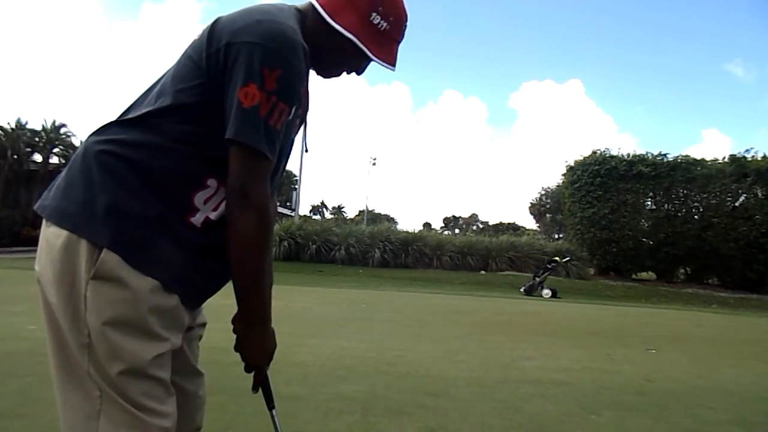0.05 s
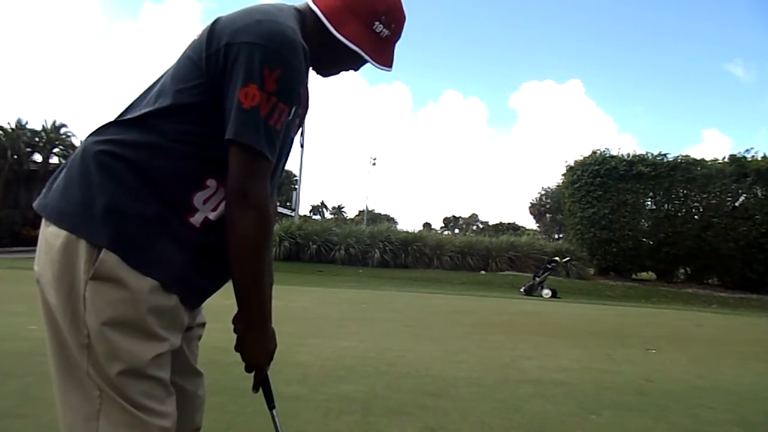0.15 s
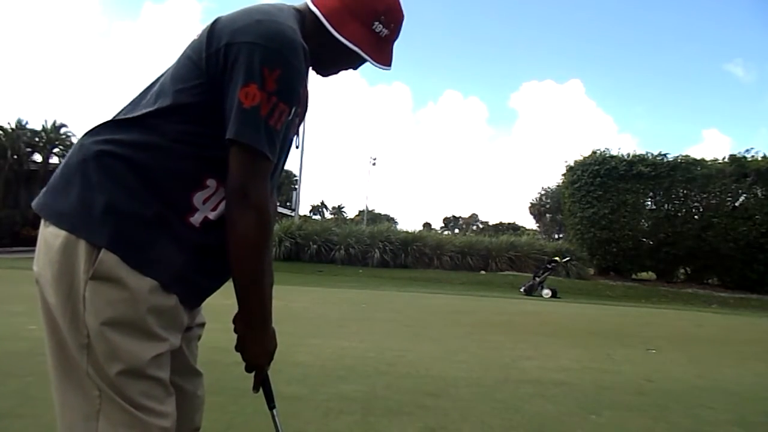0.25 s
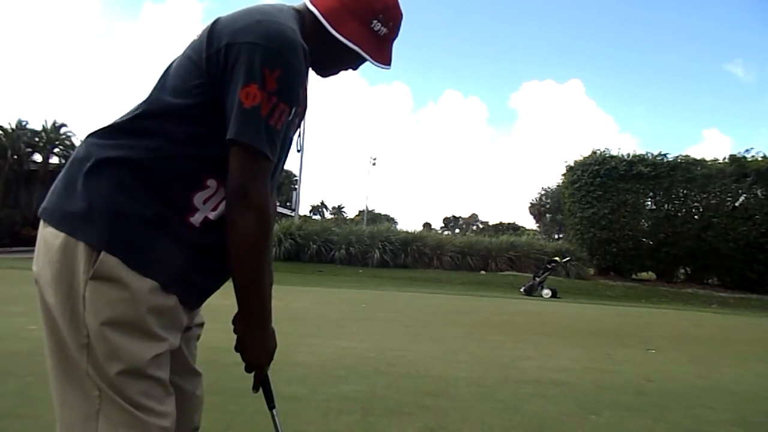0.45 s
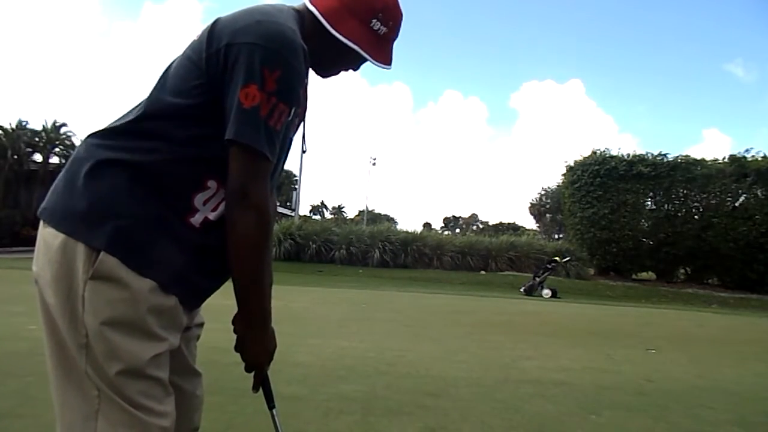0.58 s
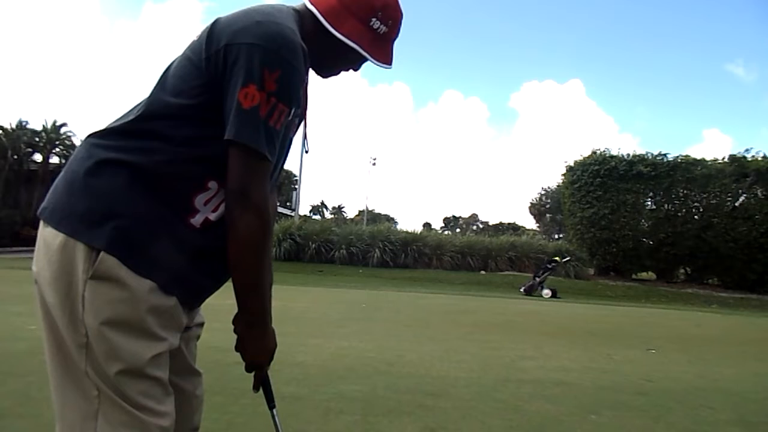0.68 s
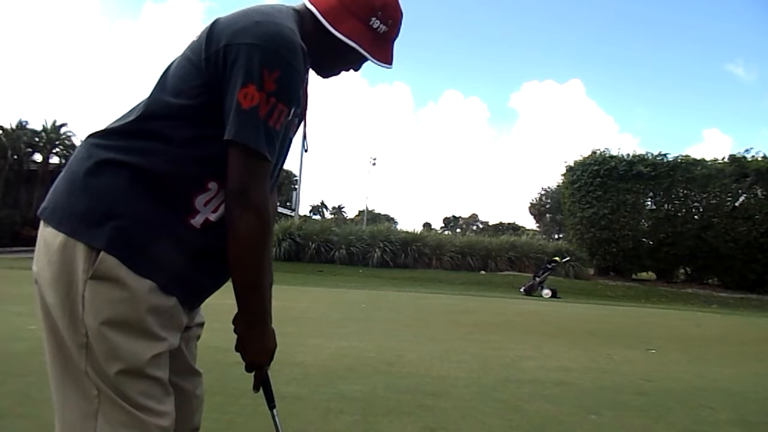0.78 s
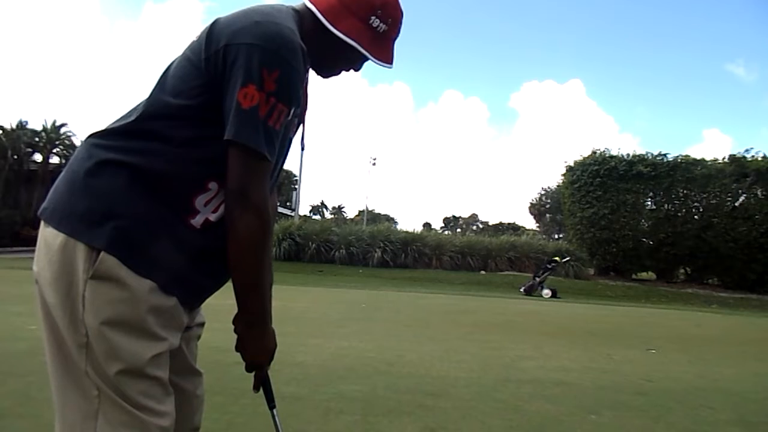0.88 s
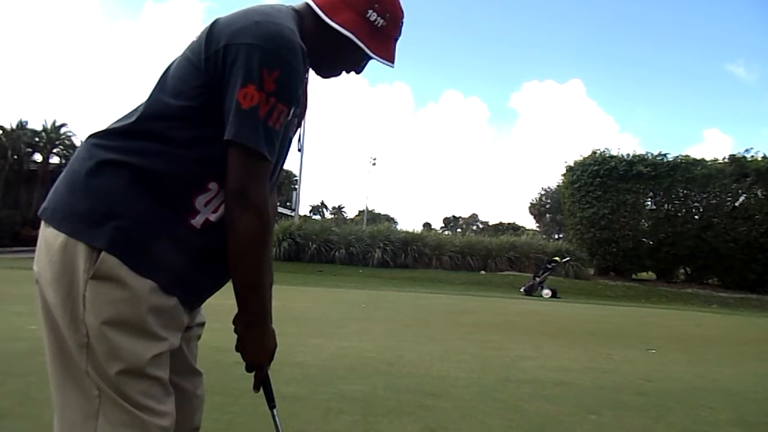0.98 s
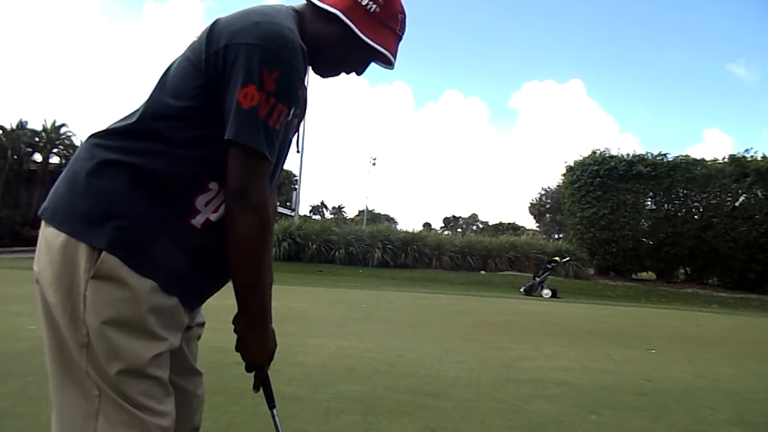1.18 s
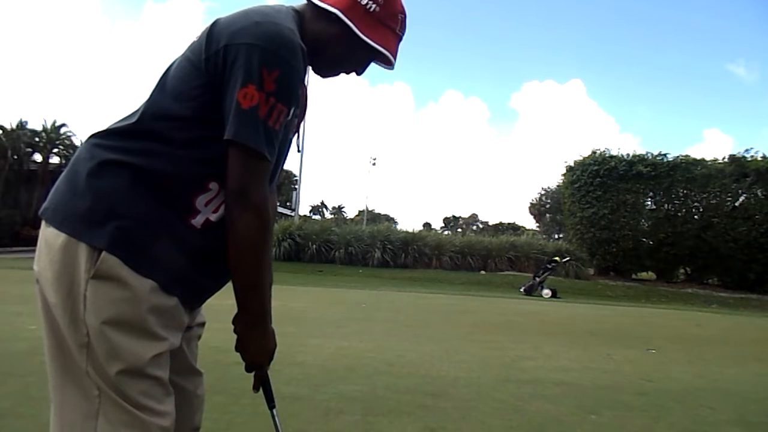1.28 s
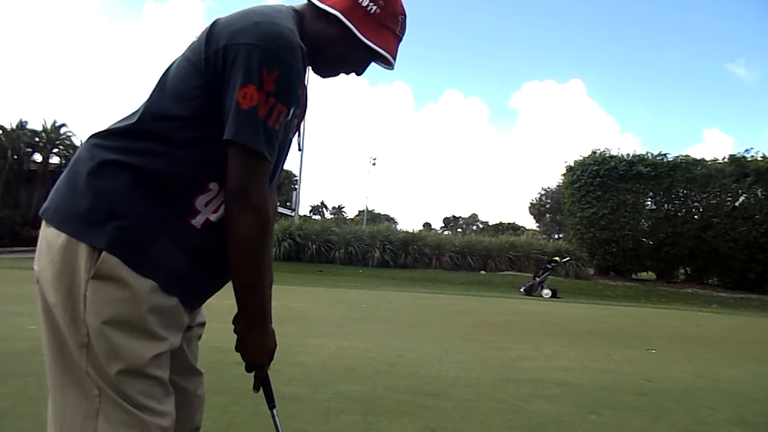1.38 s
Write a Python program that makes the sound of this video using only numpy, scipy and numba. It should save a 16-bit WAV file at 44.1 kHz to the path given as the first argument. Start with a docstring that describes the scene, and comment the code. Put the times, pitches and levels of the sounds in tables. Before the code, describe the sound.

A gust of wind rumbles and thumps directly on the microphone, growing louder and brighter before easing off. Underneath are the soft steady hiss of an open golf course and a few very faint, far-off bird chirps.

```python
"""An open golf course, where gusty wind buffets a small camera microphone.
Turbulent pressure rumbles at the port, louder and brighter as the gust grows,
and single strong eddies thump across it. Behind the wind lie a steady outdoor wash and hiss,
a deep draught, a few distant bird chirps and one faint, brief hum."""
import sys
import numpy as np
from scipy import signal
from scipy.fft import rfft, irfft
from scipy.io import wavfile
from scipy.ndimage import uniform_filter1d
from numba import njit

SR = 44100
rng = np.random.default_rng(int(sys.argv[2]) if len(sys.argv) > 2 else 0)


def store_wav(level_fs):
    """Save 16-bit WAV to argv[1]."""
    pcm = np.round(np.clip(np.atleast_2d(level_fs), -1, 1) * 32767)
    wavfile.write(sys.argv[1], SR, pcm.T.astype(np.int16))


N = 63945

# Spectrum of the outdoor wash and hiss. Each row: frequency in Hz, relative spectral density in dB.
AIR_SPECTRUM = [(100, -3.5), (400, -2), (560, -3), (900, -3), (1350, -9), (1750, -7), (2500, -16),
                (4000, -19), (7000, -21.5), (11500, -22), (15500, -25)]
# Distant bird chirps. Each row: centre time in seconds, length in seconds, pitch in Hz,
# peak level in dB, warble as a fraction of the pitch.
BIRD_CHIRPS = [(0.423, .025, 4400, -71, 0.011), (0.463, .03, 3780, -66.5, .01),
               (1.16, 0.056, 3880, -65.5, .09), (1.227, .03, 7300, -67, 0.089),
               (1.355, 0.032, 4980, -66, .1), (1.382, 0.033, 3660, -62, 0.089)]
# Strength of the gust at the microphone. Each row: time in seconds, relative level in dB.
GUST_LEVELS = [(0, -44.5), (.04, -48.5), (.072, -42.5), (.168, -39), (.186, -52.5), (.206, -34),
               (.245, -35), (.27, -42), (.382, -41), (.40, -34), (.478, -30.5), (.515, -33.5), (.55, -31.5),
               (.567, -36.5), (.635, -30), (.665, -33), (.728, -29.5), (.755, -34.5), (.785, -36.5),
               (.82, -28.5), (.856, -28), (.874, -35), (.896, -30), (.94, -25.5), (.975, -33.5),
               (1.07, -30.5), (1.146, -32), (1.205, -35), (1.25, -37), (1.315, -40), (1.345, -54),
               (1.385, -39), (1.42, -39.5), (1.45, -42.5)]
# Strong eddies that hit the port. Each row: centre time in seconds, relative peak level in dB,
# centre frequency in Hz.
EDDIES = [(0.207, -29, 393), (.210, -25, 318), (0.216, -24.5, 228), (.241, -25, 223), (0.347, -34, 261),
          (0.401, -22, 193), (.440, -18, 212), (.4575, -10, 245), (0.478, -29.5, 420), (0.543, -17.5, 202),
          (.554, -21, 640), (.5575, -14.5, 312), (.588, -18.5, 282), (.624, -17.5, 260), (0.64, -22, 300),
          (0.665, -27, 200), (.690, -19, 198), (0.719, -22, 217), (0.73, -15, 270), (.767, -36, 433),
          (0.8, -21, 234), (.8165, -19, 402), (.823, -21, 264), (.8385, -12, 434), (0.843, -17, 590),
          (.851, -18.5, 340), (.858, -27, 305), (.8865, -12, 485), (0.8959, -13, 364), (0.9001, -6.5, 365),
          (.909, -13, 468), (.918, -8.5, 420), (.927, -17, 400), (.934, -15.5, 323), (.9485, -13.5, 305),
          (1.03, -22.5, 241), (1.070, -26.5, 270), (1.078, -23, 270), (1.103, -24, 477), (1.132, -22, 430),
          (1.1445, -18, 430), (1.17, -22, 248)]


def undb(db):
    """Amplitude ratio for a level in decibels."""
    return 10 ** (np.asarray(db) / 20)


def unit(x):
    """Normalisation to an rms of 1."""
    return x / np.sqrt(np.mean(x ** 2))


def wander(per_s):
    """Random steps, smoothed by two moving averages into a drift with a spread near 1."""
    hold = max(int(SR / per_s), 2)
    steps = rng.standard_normal(2048)[np.arange(N) // hold % 2048]
    return 1.1 * uniform_filter1d(uniform_filter1d(steps, hold), hold)


@njit
def lowpass(x, hz, damping):
    """A damped two-pole system attenuates what lies above its corner, given for each sample."""
    y = np.empty(len(x))
    band_state, low_state = 0., 0.
    for i in range(len(x)):
        g = np.tan(np.pi * hz[i] / SR)
        band = (band_state + g * (x[i] - low_state)) / (1 + g * (g + damping))
        y[i] = low_state + g * band
        band_state = 2 * band - band_state
        low_state = 2 * y[i] - low_state
    return y


def steep_lowpass(x, hz, damping):
    """Slopes add in cascade: two stages fall by 24 dB per octave."""
    return lowpass(lowpass(x, hz, damping), hz, damping)


def highpass(x, hz):
    """Two poles roll off the bass by 12 dB per octave."""
    return signal.sosfilt(signal.butter(2, hz, "high", fs=SR, output="sos"), x)


def outdoor_air(level_db=-54.5):
    """Spectral shaping turns white noise into a stationary wash and hiss."""
    hz, db = np.array(AIR_SPECTRUM).T
    bin_hz = np.maximum(np.fft.rfftfreq(N, 1 / SR), 1)
    gain = undb(np.interp(np.log(bin_hz), np.log(hz), db))
    wash = irfft(rfft(rng.standard_normal(N)) * gain, N)
    return unit(wash) * undb(level_db)


def swell(t, at, length):
    """A bell-shaped envelope, its length two standard deviations."""
    return np.exp(-2 * ((t - at) / length) ** 2)


def birds(t):
    """Random frequency modulation widens each chirp: shallow sounds pure, deep sounds raspy."""
    time_drift = np.cumsum(wander(per_s=700)) / SR
    chirps = np.zeros(N)
    for at, length, hz, db, warble in BIRD_CHIRPS:
        phase = 2 * np.pi * hz * (t + warble * time_drift)
        chirps += undb(db) * swell(t, at, length) * np.sin(phase)
    return chirps


def hum(t, hz=404, peak_db=-52.5):
    """A faint pure tone sounds briefly in the lull, where the wind masks it less."""
    return undb(peak_db) * swell(t, at=1.372, length=.06) * np.sin(2 * np.pi * hz * t)


def draught(corner_hz=58.4, level_db=-57.5):
    """Noise limited to a low band is heard as a deep stirring that lasts between the gusts."""
    stir = lowpass(rng.standard_normal(N), np.full(N, corner_hz), np.sqrt(2))
    return unit(highpass(stir, hz=45)) * undb(level_db)


def rumble(t, flutter_db=1.5, trim_db=-1):
    """Turbulent pressure at the port: faster air is louder and carries smaller, higher-pitched eddies."""
    reference_hz, reference_db, db_per_octave = 318, -29.5, 15  # how the corner follows the gust
    gust_db = np.interp(t, *np.array(GUST_LEVELS).T) + flutter_db * wander(per_s=70)
    octaves = (gust_db - reference_db) / db_per_octave
    corner_hz = np.clip(reference_hz * 2 ** octaves, 20, SR / 10)
    pressure = steep_lowpass(rng.standard_normal(N), corner_hz, damping=1.25)
    pressure = highpass(pressure, hz=116.4)  # the microphone's bass roll-off
    levelled = unit(pressure / np.sqrt(corner_hz))  # noise power grows with bandwidth
    return levelled * undb(gust_db + trim_db)


def buffets(t, trim_db=.5, rasp_db=-21.5, rasp_edge_ratio=2.39):
    """A passing eddy is a push and pull of pressure; a smaller one passes sooner and sounds higher."""
    steepness = 5.43  # how sharply an eddy's spectrum falls away from its centre
    thumps, noise = np.zeros(N), rng.standard_normal(N)
    for (at, db, hz), lean in zip(EDDIES, rng.random(len(EDDIES))):
        passage = 2 * np.pi * hz * (t - at) / steepness
        pulse = (1 - 1j * passage) ** -steepness
        eddy = np.exp(2j * np.pi * lean) * pulse  # a random phase makes it lopsided
        edge_hz = np.full(N, min(rasp_edge_ratio * hz, SR / 10))
        rasp = unit(steep_lowpass(noise, edge_hz, np.sqrt(2)))  # fine turbulence inside the eddy
        thumps += undb(db + trim_db) * (eddy.real + undb(rasp_db) * np.abs(eddy) * rasp)
    return thumps


def scene():
    """Superposition: the wind and the quiet background add as pressures in one channel."""
    t = np.arange(N) / SR
    return (rumble(t) + buffets(t) + draught() + outdoor_air() + birds(t) + hum(t))[None]


def record(dry, bottom_hz=28.8, top_hz=15800):
    """Band limiting: the camera drops the deepest bass and cuts the top steeply."""
    treble_cut = signal.ellip(10, .2, 80, top_hz, fs=SR, output="sos")
    return signal.sosfilt(treble_cut, highpass(dry, bottom_hz))


dry = scene()
out = record(dry)
store_wav(out)
```